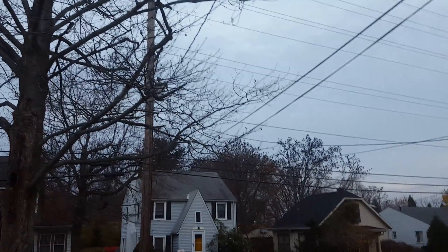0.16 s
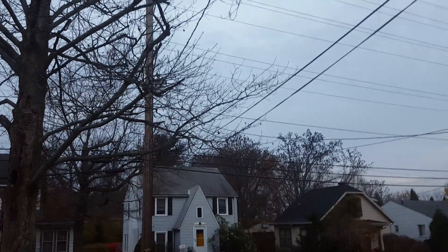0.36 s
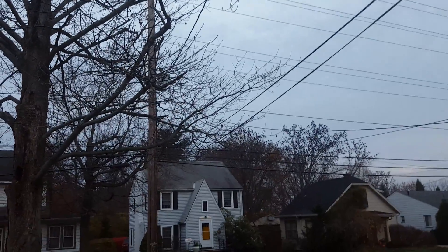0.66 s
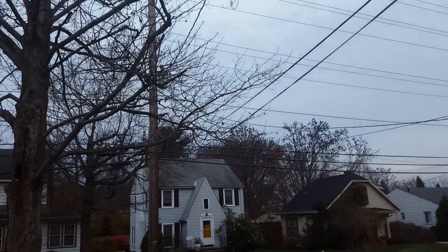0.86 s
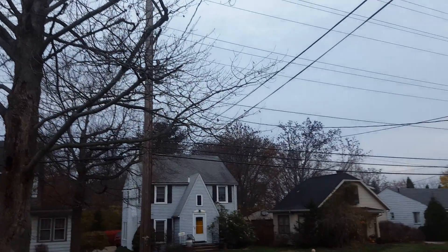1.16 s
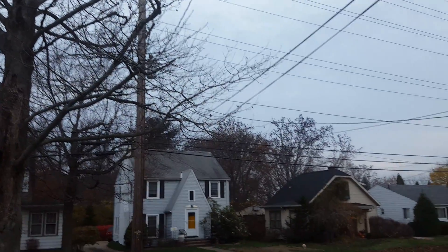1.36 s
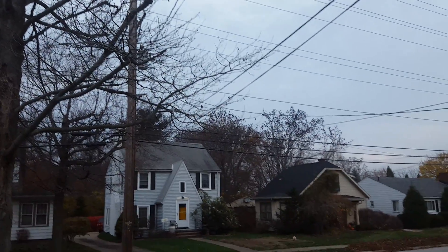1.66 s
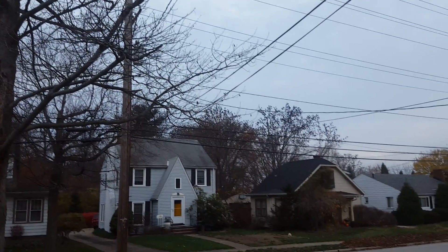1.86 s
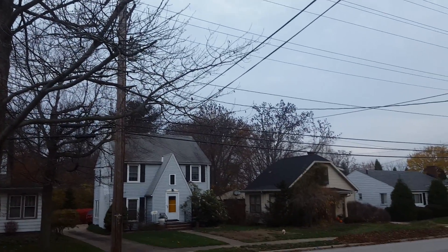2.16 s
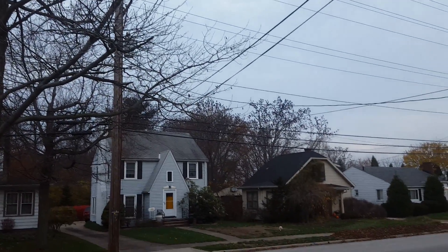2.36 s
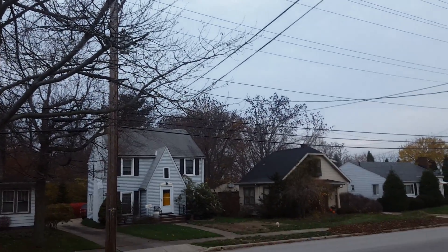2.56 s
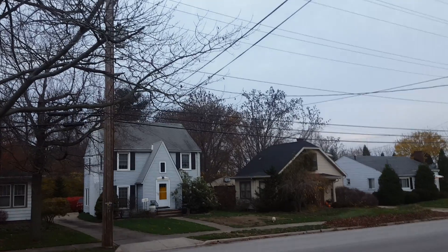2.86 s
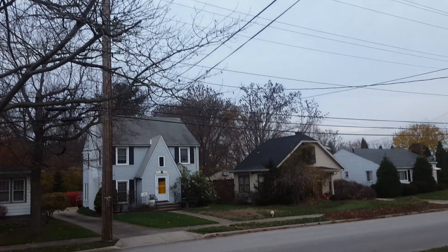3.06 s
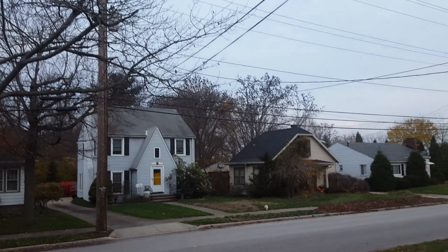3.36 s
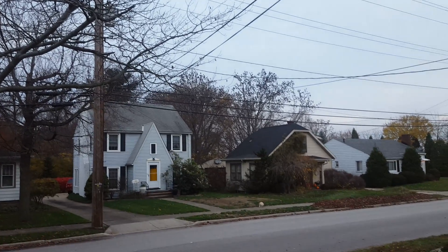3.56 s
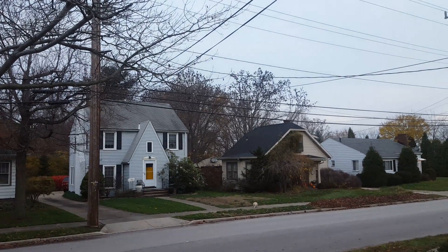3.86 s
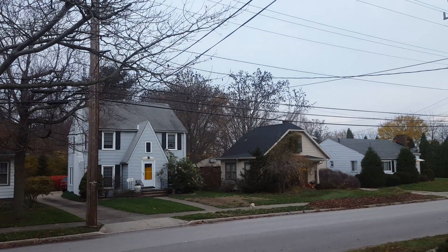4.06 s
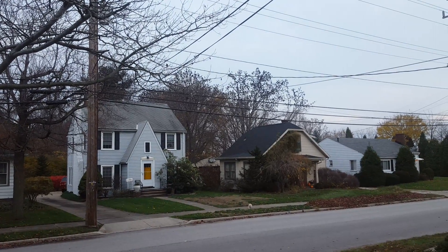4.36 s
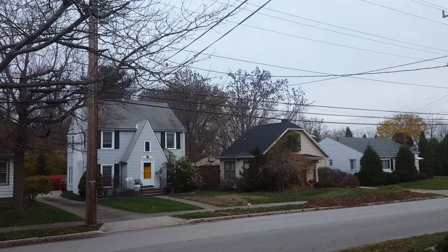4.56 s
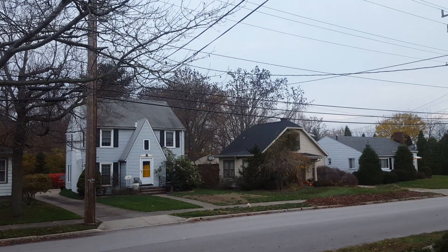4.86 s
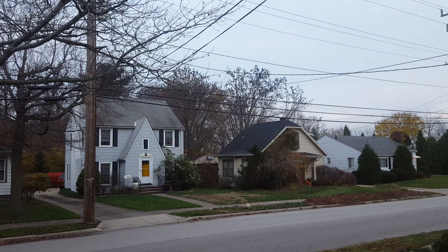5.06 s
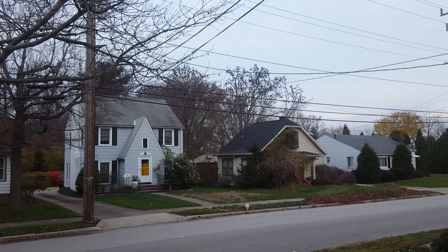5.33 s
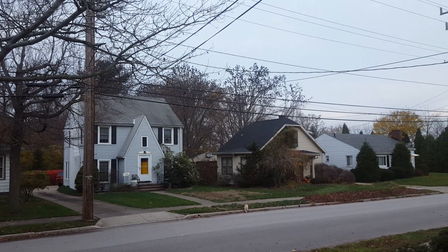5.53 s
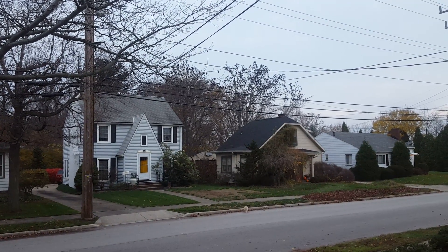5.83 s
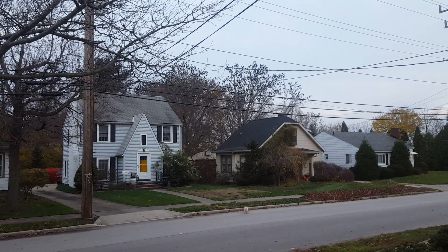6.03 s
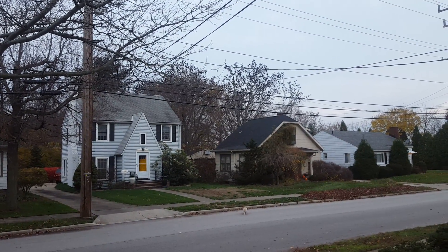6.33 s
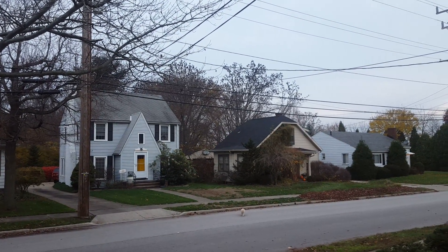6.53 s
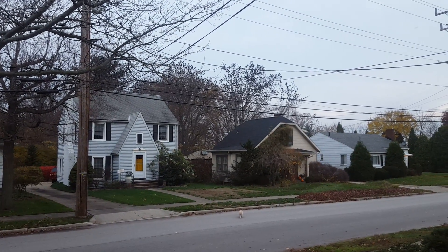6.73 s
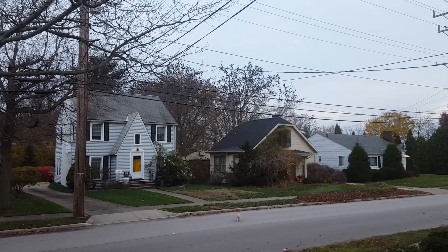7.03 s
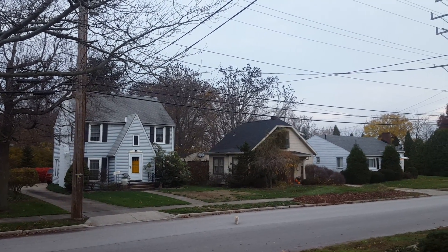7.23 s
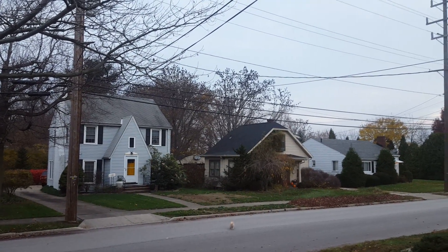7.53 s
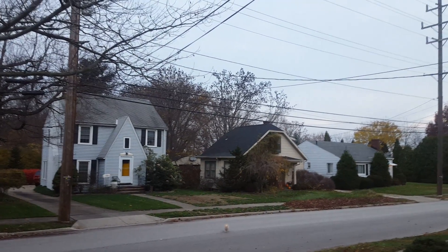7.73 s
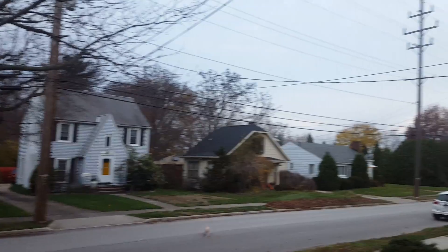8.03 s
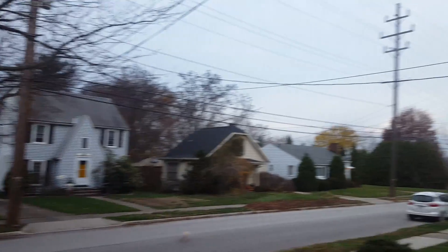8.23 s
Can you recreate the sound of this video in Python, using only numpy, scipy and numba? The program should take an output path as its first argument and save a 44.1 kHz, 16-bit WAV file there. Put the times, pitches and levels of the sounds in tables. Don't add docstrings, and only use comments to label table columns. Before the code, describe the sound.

A huge starling flock blurs into bright, sizzling squeaks along a suburban street, with low traffic rumble and a few soft bumps on the microphone.

```python
import sys
import numpy as np
from scipy import signal
from scipy.fft import rfft, irfft, next_fast_len
from scipy.io import wavfile
from scipy.ndimage import map_coordinates
from numba import njit

SR = 44100
rng = np.random.default_rng(int(sys.argv[2]) if len(sys.argv) > 2 else 0)


def transcribe(u):
    v = np.clip(np.atleast_2d(u).T, -1, 1)
    q = np.round(v * 32767).astype(np.int16)
    wavfile.write(sys.argv[1], SR, q)


def linear_from_db(decibels):
    return 10 ** (np.asarray(decibels, float) / 20)


N = 369994

# (time [s], level [dB])
TRAFFIC_LEVEL = [
    (0.0, -54),
    (0.33, -57),
    (0.79, -54.5),
    (1.24, -56),
    (4.86, -54),
    (5.14, -56),
    (7.03, -52.5),
    (7.76, -50),
    (8.11, -52),
    (8.39, -56),
]
# (frequency [Hz], density [dB per Hz])
TRAFFIC_TONE = [(12, -49), (20, -12), (38, -18), (52, -1), (70, -1), (88, -0.5), (146, -13), (252, -11),
                (284, -12), (310, -11.5), (333, -13), (480, -14.5), (669, -3.5), (826, -6.5), (1300, -0.5),
                (1690, -54), (2860, -120)]
# (frequency [Hz], correlation [-1 to 1])
STEREO_LIKENESS = [(100, 0.98), (250, 0.85), (500, 0.63), (850, 0.22), (1300, -0.11), (2250, 0.55),
                   (3000, -0.33), (4400, 0.035), (6000, 0.017)]
# (time [s], peak [dB], frequency [Hz], length [cycles])
FINGER_BUMPS = [(2.356, -36, 148, 1.4), (2.374, -34, 80.7, 1.6), (2.501, -37, 80.7, 1.4),
                (6.469, -34, 124, 1.3), (7.389, -37, 72.7, 1.8), (7.583, -30, 127, 1.4),
                (7.634, -25, 160, 1.4), (7.644, -26.5, 196, 2.2), (7.683, -31, 202, 1.4),
                (7.709, -34, 127, 1.4), (7.759, -40, 72.7, 1.4), (7.817, -21.5, 287, 0.96),
                (7.829, -30, 111, 2.1)]
# (frequency [Hz], density [dB per Hz])
LEFT_PORT_TONE = [(1205, -68.8), (3100, -62.0), (4306, -67.6), (5167, -67.5), (5512, -72.0), (6718, -58.4),
                  (8613, -89.7), (9043, -85.2), (10249, -90.1), (11800, -81.2), (12316, -81.4),
                  (14211, -97.1), (15073, -106.4), (15245, -112.4)]
# (frequency [Hz], density [dB per Hz])
RIGHT_PORT_TONE = [(1205, -67.2), (3273, -59.9), (4220, -64.1), (5340, -62.3), (5770, -69.0), (6459, -60.2),
                   (7407, -70.9), (8613, -89.1), (9130, -86.7), (9991, -89.3), (11455, -87.5),
                   (12058, -90.2), (14211, -104.9), (15245, -116.7)]
# (time [s], swell [dB])
EXCITEMENT = [(0, 0.3), (.75, 0.5), (1.4, 0), (1.85, 0), (2.65, -.6), (3.1, 0), (3.35, 0.6), (4.2, -0.7),
              (4.8, 0.2), (5.25, 0.5), (5.65, -.5), (6.15, 0.3), (6.5, -0.3), (6.9, 0), (7.3, .4), (7.6, 0),
              (7.85, .6), (8.39, -1)]
# (time [s], rise [dB])
OUTBURSTS = [(0.77, -1), (1.1, 3), (1.54, 1.3), (1.78, 1.5), (1.95, 2.5), (2.22, 2), (2.53, 3.5), (3.3, .8),
             (3.85, 4.5), (4.07, 1.5), (4.84, 0.5), (5.3, 2), (6.38, -1.5), (6.9, 2), (7.28, -1),
             (7.82, 1.5), (8.38, 6)]
# (time [s], length [s], start pitch [Hz], end pitch [Hz], level [dB])
CLEAR_NOTES = [(0.058, 0.086, 6579, 6688, -31), (0.27, 0.03, 6108, 5901, -33),
               (0.369, 0.026, 3978, 4030, -37.5), (3.635, 0.09, 7050, 7480, -38),
               (1.306, 0.028, 4933, 5168, -37.6), (1.745, 0.044, 6800, 6740, -31),
               (1.755, 0.074, 6370, 5900, -33), (1.84, 0.025, 6480, 6470, -31),
               (1.955, 0.041, 6180, 6150, -29), (2.0, 0.094, 6340, 6200, -29.5),
               (2.196, 0.039, 6323, 6349, -33), (3.368, 0.042, 4396, 4456, -34),
               (4.04, 0.025, 4541, 4500, -32.5), (4.475, 0.05, 4690, 4855, -28),
               (4.705, 0.036, 2550, 2821, -38), (5.366, 0.026, 5230, 5270, -31),
               (5.525, 0.049, 5130, 5450, -31), (6.229, 0.03, 6867, 7042, -32),
               (6.507, 0.039, 2767, 2731, -30.5), (6.74, 0.061, 6912, 7098, -33),
               (7.31, 0.026, 6592, 6680, -28), (8.175, 0.028, 6130, 6200, -32.5),
               (2.295, 0.03, 4050, 4000, -37), (8.295, 0.12, 6276, 6406, -33.1)]
# (time [s], length [s], start pitch [Hz], end pitch [Hz], level [dB])
ROUGH_NOTES = [(0.541, 0.091, 6330, 6330, -35), (0.821, 0.11, 6230, 6900, -31.5),
               (1.673, 0.031, 6611, 6700, -31), (1.679, 0.21, 9645, 10800, -57),
               (1.726, 0.15, 6780, 6640, -31.5), (2.188, 0.12, 7442, 7076, -44),
               (2.267, 0.043, 6500, 6550, -28), (2.281, 0.038, 4943, 5131, -38),
               (2.547, 0.036, 6701, 6630, -25), (3.133, 0.058, 8324, 8306, -52),
               (3.612, 0.11, 7000, 7530, -35.5), (4.836, 0.071, 10894, 11535, -53),
               (4.875, 0.026, 3931, 4160, -31), (4.952, 0.033, 7475, 7600, -39),
               (5.328, 0.063, 5758, 6340, -34), (6.206, 0.03, 2656, 2461, -31),
               (6.313, 0.15, 6941, 7280, -34), (6.32, 0.145, 10615, 10500, -57),
               (6.709, 0.028, 7226, 7048, -32), (7.207, 0.068, 12046, 12768, -52),
               (7.226, 0.053, 6300, 6388, -30.5), (7.811, 0.052, 6200, 6580, -30),
               (7.903, 0.081, 7006, 7000, -35), (8.343, 0.046, 11688, 11199, -56)]
# (time [s], period [s], start pitch [Hz], end pitch [Hz], level [dB], fade [dB per chirp])
FALLING_TRILL = (7.372, .014, 5200, 4600, -28, -1.5)

SQUEAK_FOLLOWS, SHRILL_FOLLOWS, RASP_FOLLOWS = 0.88, 1.8, 1
OUTBURST_HALF_S, SHRILL_SHARE = 0.043, 0.63
FLICKER_DB = 0.92
SPREAD_DB = 3
STRAY_S, STRAY_GLIDE = 0.035, 0.0795


def unit(x):
    return x / np.sqrt(np.mean(x ** 2) + 1e-20)


def along(points, hz):
    f, v = np.transpose(points)
    return np.interp(np.log(hz + 1), np.log(f + 1), v)


def curve(points):
    s, value = np.transpose(points)
    return np.interp(np.arange(N) / SR, s, value)


def filtered(x, response):
    size = next_fast_len(N + 8192)
    gain = response(np.fft.rfftfreq(size, 1 / SR))
    return irfft(rfft(x, size) * gain, size)[..., :N]


def wobble(rate):
    knots = rng.standard_normal(int(N * rate / SR) + 4)
    return map_coordinates(knots, [np.arange(N) * rate / SR])


def diffuse():
    def mid_side_gain(hz):
        turn = np.arccos(np.clip(along(STEREO_LIKENESS, hz), -1, 1)) / 2
        return np.array([np.cos(turn), np.sin(turn)])

    mid, side = filtered(rng.standard_normal((2, N)), mid_side_gain)
    return unit(np.array([mid + side, mid - side]))


def street():
    level = curve(TRAFFIC_LEVEL)
    town = unit(filtered(diffuse(), lambda hz: linear_from_db(along(TRAFFIC_TONE, hz))))
    bass = filtered(town, lambda hz: 1 / (1 + (hz / 170) ** 8))
    engines = linear_from_db(0.64 * (level - level.mean())) * bass
    murmur = (town - bass) * linear_from_db(np.array([[-0.3], [0.3]]))
    hum = linear_from_db(-65.5) * np.sin(2 * np.pi * 361 * np.arange(N) / SR)
    return linear_from_db(-42) * (engines + murmur) + hum


def fingers():
    x, t = np.zeros(N + SR), np.arange(SR // 8) / SR
    for s, db, hz, cycles in FINGER_BUMPS:
        u = t * hz / np.clip(cycles, 0.4, 6)
        thud = u * np.exp(-2.5 * u * u) * np.sin(2 * np.pi * hz * t)
        x[round(s * SR):][:len(t)] += linear_from_db(db + 6) * thud
    return x[:N]


def ports(hz):
    notch = linear_from_db(-2.1 * np.exp(-((hz - 5760) / 130) ** 2))
    no_bass = 1 / (1 + (1250 / (hz + 1)) ** 12) ** 0.5
    tone = linear_from_db(np.array([along(LEFT_PORT_TONE, hz), along(RIGHT_PORT_TONE, hz)]))
    return tone * np.sqrt(SR / 2) * notch * no_bass


def syrinx(width_hz):
    return unit(filtered(rng.standard_normal((2, N)), lambda hz: np.exp(-(hz / width_hz) ** 2)))


@njit
def sing(notes, flutter, edge, n, sr):
    out = np.zeros((2, n))
    for k in range(len(notes)):
        s, life, a, b, left, right, rough, lag = notes[k]
        start, size = max(int(s * sr), 0), int(life * sr)
        spin, step = np.exp(7j * lag), np.exp(2j * np.pi * a / sr)
        glide, shift = np.exp(2j * np.pi * (b - a) / sr / size), np.exp(1j * lag)
        first = k * 7919 % (n - size)
        for i in range(min(size, n - start)):
            step *= glide
            spin *= step
            swell = min(1.0, i / size / edge, (1 - i / size) / edge)
            air_left = 1 - rough + rough * flutter[0, first + i]
            air_right = 1 - rough + rough * flutter[1, first + i]
            out[0, start + i] += left * swell * air_left * spin.imag
            out[1, start + i] += right * swell * air_right * (spin * shift).imag
    return out


def crowd(count):
    u = rng.random((count, 8))
    start = u[:, 0] * N / SR - 0.05
    pitch, life = 1300 * 3.6 ** u[:, 1], 0.018 * 5 ** u[:, 2]
    end = pitch * (1 + 0.1596 * (u[:, 3] - 0.5))
    size, pan = linear_from_db(-3 * np.log(u[:, 4] + 0.04)), linear_from_db(9 * (u[:, 5] - 0.5))
    rough = 0.9 * u[:, 6]
    notes = [np.c_[start, life, k * pitch, k * end, size * pan, size / pan, rough, k * 40 * u[:, 7]]
             for k in range(1, 5)]
    x = sing(np.vstack(notes), syrinx(width_hz=315), 0.23, N, SR)
    hz, power = signal.welch(x.sum(0), SR, nperseg=128)
    floor = 0.0049 * power.max()
    return unit(filtered(x, lambda f: (np.interp(f, hz, power) + floor) ** -0.5))


def swells():
    mood, t = curve(EXCITEMENT), np.arange(N) / SR
    mood = mood - mood.mean()
    burst = sum(db * np.clip(1 - np.abs(t - s) / (2 * OUTBURST_HALF_S), 0, 1) for s, db in OUTBURSTS)
    burst = burst - burst.mean()
    squeaks = SQUEAK_FOLLOWS * mood + 0.15 * wobble(8)
    shrill = SHRILL_FOLLOWS * mood + SHRILL_SHARE * burst + FLICKER_DB * wobble(11)
    rasp = RASP_FOLLOWS * mood + burst + FLICKER_DB * wobble(9)
    return squeaks, shrill, rasp


def chorus():
    squeaks, shrill, rasp = swells()
    wash = linear_from_db(-1.0) * diffuse() + linear_from_db(-6.5) * crowd(count=4000)
    low = filtered(wash, lambda hz: 1 / (1 + (hz / 5600) ** 20))
    high = filtered(wash, lambda hz: 1 - 1 / (1 + (hz / 8300) ** 20))
    return linear_from_db(squeaks) * low + linear_from_db(shrill) * (wash - low - high) + linear_from_db(rasp) * high


def strays(count, low_hz, octaves, over_db):
    u = rng.random((count, 5))
    pitch = low_hz * 2 ** (octaves * u[:, 1])
    end = pitch * (1 + STRAY_GLIDE * (u[:, 3] - 0.5))
    hiss_db = (along(LEFT_PORT_TONE, pitch) + along(RIGHT_PORT_TONE, pitch)) / 2
    return np.c_[u[:, 0] * N / SR, STRAY_S * 3 ** u[:, 2], pitch, end, hiss_db + over_db + 5 * u[:, 4]]


def trill(count):
    s, period, a, b, db, fade_db = FALLING_TRILL
    return [(s + k * period, 1.2 * period, a - 50 * k, b - 50 * k, db + fade_db * k) for k in range(count)]


def near(table, rough, width_hz, lift_db, stretch, scatter=1):
    s, life, a, b, db = np.transpose(table)
    size = linear_from_db(db + lift_db) * np.sqrt(2 / np.mean(ports((a + b) / 2) ** 2, 0))
    seat = rng.random((len(s), 2))
    lag = scatter * (3 * seat[:, 0] - 1.5)
    pan = linear_from_db(scatter * SPREAD_DB * (3 * seat[:, 1] - 1.2) / 2)
    start = s - (stretch - 1) * life / 2
    roughness = np.clip(rough, 0, 1) + 0 * s
    notes = np.c_[start, stretch * life, a, b, size * pan, size / pan, roughness, lag]
    return sing(notes, syrinx(width_hz), 0.28, N, SR)


def soloists():
    clear = np.vstack([CLEAR_NOTES,
                       strays(count=20, low_hz=7400, octaves=0.8, over_db=27),
                       strays(count=70, low_hz=5900, octaves=0.3, over_db=20)])
    buzzy = np.vstack([ROUGH_NOTES, strays(count=24, low_hz=7400, octaves=0.73, over_db=23)])
    whistles = near(clear, rough=0.36, width_hz=110, lift_db=0.7, stretch=1.3)
    buzzes = near(buzzy, rough=0.89, width_hz=450, lift_db=1.5, stretch=1.3)
    chirps = near(trill(count=7), rough=0.5, width_hz=350, lift_db=0.1, stretch=1.2, scatter=0.2)
    return whistles + buzzes + chirps


def flock():
    return linear_from_db(-0.04) * filtered(chorus() + soloists(), ports)


def scene():
    return street() + fingers() + flock()


def roll_off(x):
    return signal.sosfilt(signal.butter(12, 15700, fs=SR, output="sos"), x)


def record(dry):
    hz, t, z = signal.stft(dry, SR, window=("tukey", 1), nperseg=1024)
    hz = hz[:, None]
    chance = np.repeat(rng.standard_normal(len(t) // 2 + 1), 2)[:len(t)]
    edge_hz = np.maximum(14700 + 700 * chance, 13100)
    lift_db = np.clip((hz - 13800) / 250, 0, 8)
    kept = (hz < edge_hz) * linear_from_db(lift_db)
    fluttered = signal.istft(z * kept, SR, window=("tukey", 1), nperseg=1024)[1][:, :N]
    return roll_off(fluttered)


dry = scene()
out = record(dry)
transcribe(out)
```